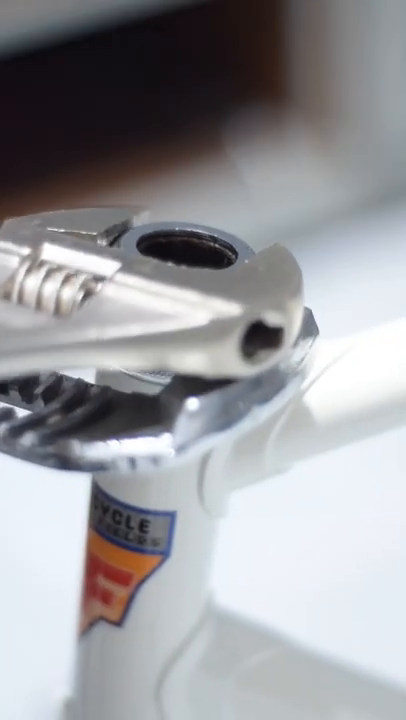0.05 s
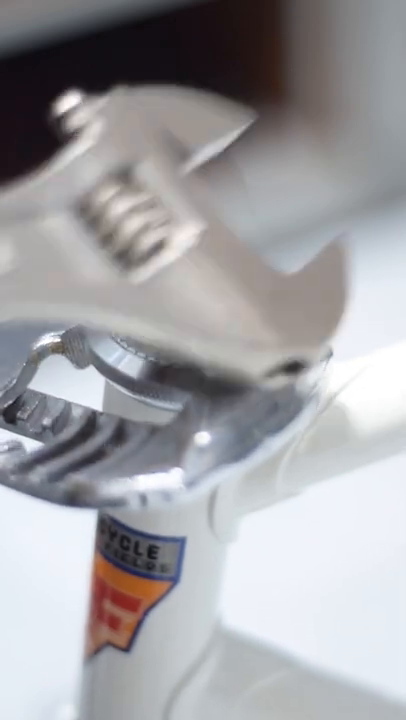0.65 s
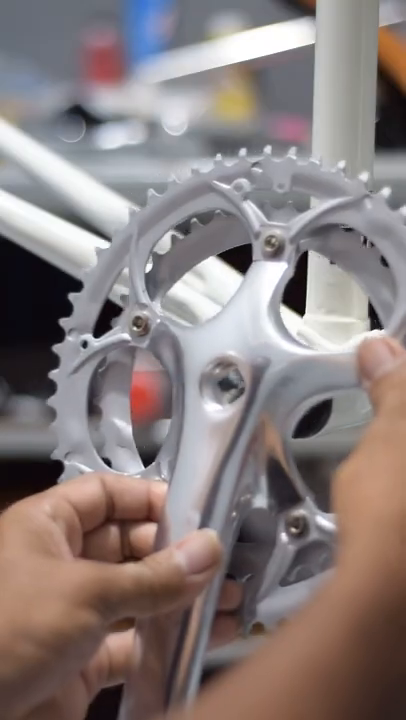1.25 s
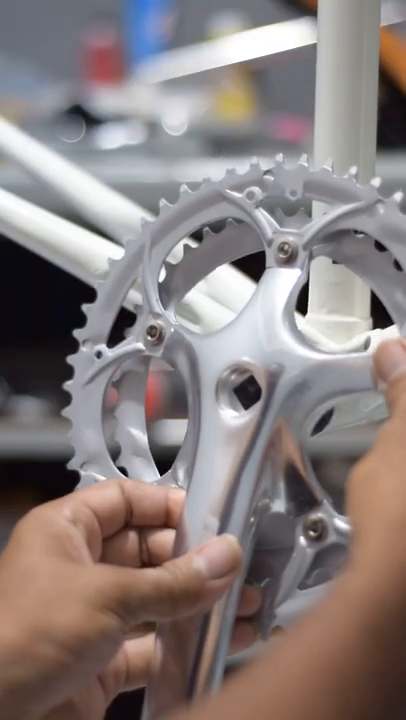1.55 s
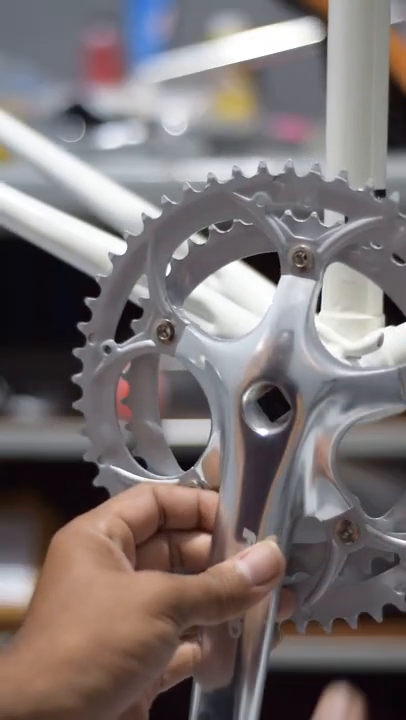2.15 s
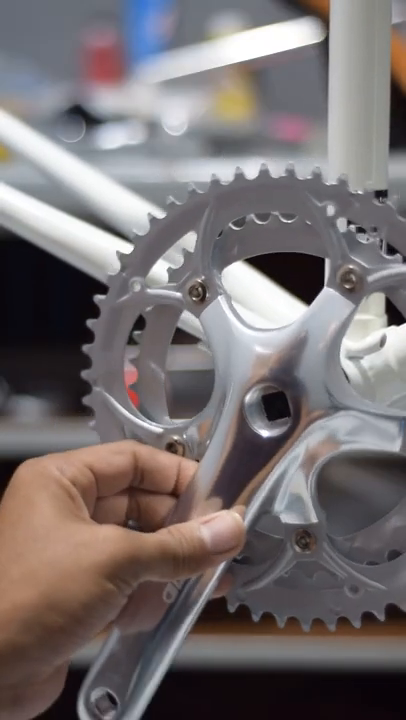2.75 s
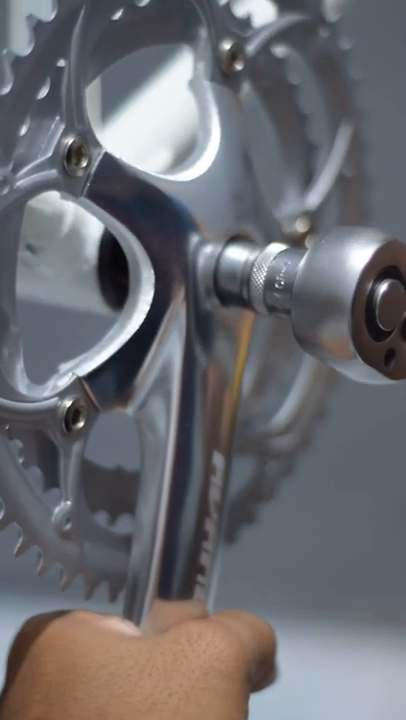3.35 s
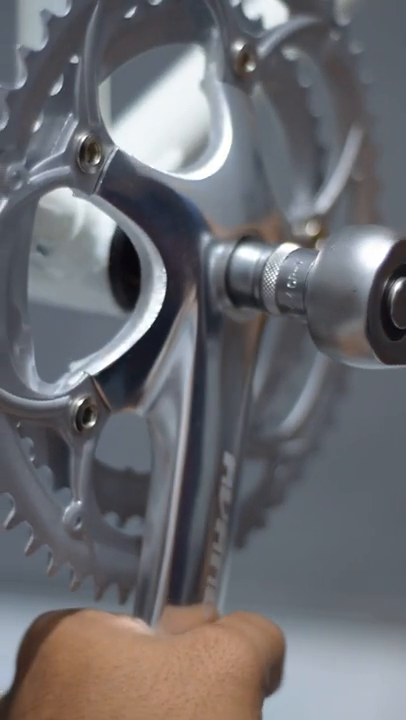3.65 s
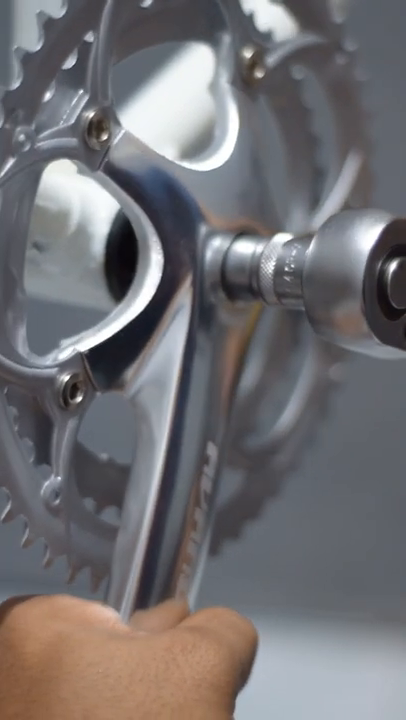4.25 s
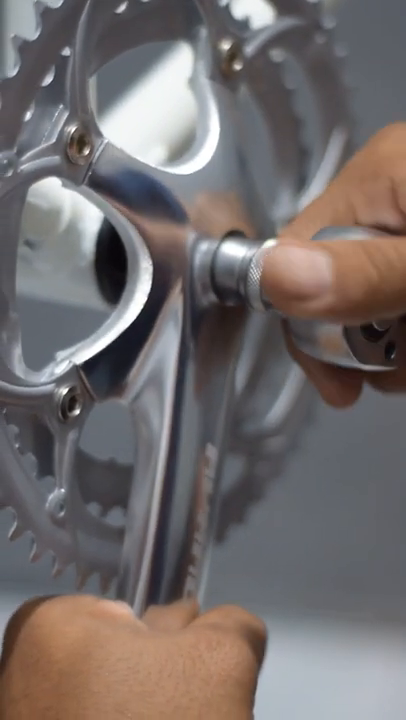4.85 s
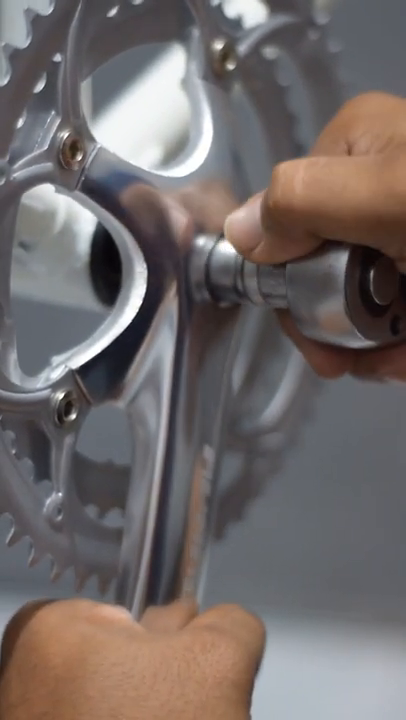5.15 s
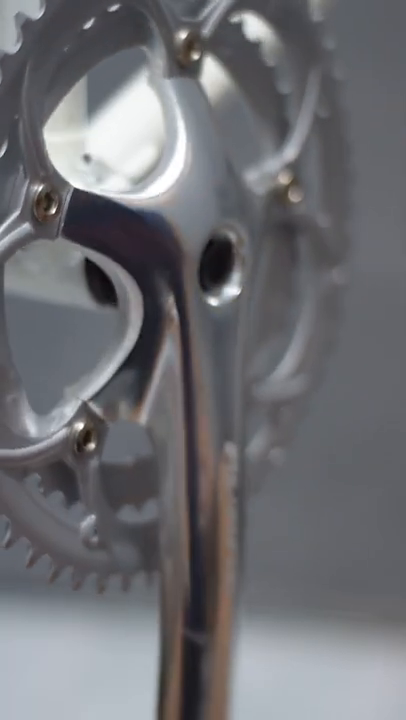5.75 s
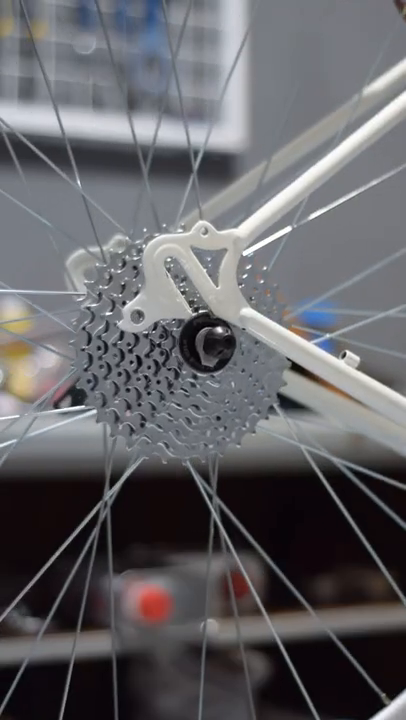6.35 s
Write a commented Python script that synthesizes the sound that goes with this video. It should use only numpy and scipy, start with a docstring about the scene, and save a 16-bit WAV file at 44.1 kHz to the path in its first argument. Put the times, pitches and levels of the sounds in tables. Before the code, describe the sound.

Rushing air and a wrench clink, then metal knocks and a clicking ratchet as a bicycle is assembled in a workshop.

```python
"""A hard-walled workshop where a bicycle is being put together, heard in mono. A wrench clinks off the
headset nut over a loud rush of air that stops abruptly. The chainset (cranks and chainrings) knocks onto
its axle, a ratchet clicks on the crank bolt, its socket is pulled off, and a wheel starts to spin.
Each hit is a short crack of noise, the ringing tones of the part, and the room's echo.
The air, the sliding metal and the whirring wheel are shaped noise."""
import sys
import numpy as np
from scipy import signal
from scipy.fft import rfft, irfft, next_fast_len
from scipy.io import wavfile
from scipy.ndimage import map_coordinates

SR = 44100
rng = np.random.default_rng(int(sys.argv[2]) if len(sys.argv) > 2 else 0)


def to_wav(s):
    """Save 16-bit WAV."""
    ch = np.atleast_2d(s).T  # columns
    pcm = np.round(np.clip(ch, -1, 1) * 32767)  # PCM
    wavfile.write(sys.argv[1], SR, pcm.astype(np.int16))


N = 282681

# The ratchet's clicks (time [s], relative level [dB], extra ring [dB])
RATCHET_CLICKS = [(3.0402, -43, -13), (3.0791, -20.5, -0.5), (3.1264, -16.5, 7), (3.1632, -19.5, 6.5),
                  (3.1937, -19, 13), (3.225, -17.5, 7.5), (3.2544, -21.5, -3), (3.2877, -21.5, -0.5),
                  (3.3294, -21, 1.5), (3.4115, -20.5, -5), (3.4637, -18, -5), (3.5142, -17.5, 3.5),
                  (3.5737, -19, -5), (3.712, -40, 0.5), (4.0731, -19.5, 3)]
# The tones it rings with (pitch [Hz], relative level [dB], time to fade by 60 dB [s])
RATCHET_TONES = [(1579, -22.5, 0.023), (1593, -13, 0.026), (3660, -11, 0.0089), (3804.5, -13.5, .05),
                 (4695, -23, 0.206), (5914, -20, 0.056), (7254, -10.5, 0.019), (7480, -10, 0.02),
                 (10984, -4.5, 0.0097), (10939, -6, 0.0148)]
# The colour of its crack (frequency [Hz], relative level [dB])
RATCHET_COLOUR = [(50, -68.5), (150, -54), (300, -26.5), (550, -10), (1000, -6), (1500, 3.5), (2100, -3.5),
                  (3600, -1), (5000, -1.5), (9500, -3), (12500, -12.5), (16000, -14.5)]

def ratchet():
    """A small catch drops over each tooth and bounces once; a slower handle gives a brighter snap."""
    tooth_s, slow_bright = 0.041, 0.9762  # usual wait; dB per octave gained each time the wait doubles
    bounce_s, bounce_db = .0072, -14.5
    pause_s, lift_s, lift_db = .3, .016, -24
    times = [row[0] for row in RATCHET_CLICKS]
    waits = np.diff(times, prepend=times[0] - tooth_s)
    touches = []
    for (s, db, ring_db), wait in zip(RATCHET_CLICKS, waits):
        bright = slow_bright * np.log2(wait / tooth_s)
        graze = (bright + 3.5, ring_db - 10.5)  # glancing touches are brighter and ring less
        touches.append((s, db, bright, ring_db))
        touches.append((s + bounce_s, db + bounce_db, *graze))
        if wait > pause_s:  # after a pause, the catch ticks on the tooth's tip before it drops
            touches.append((s - lift_s, db + lift_db, *graze))
    return strike(touches, RATCHET_TONES, RATCHET_COLOUR,
                  crack_s=0.0595, gain_db=20, echo_db=-1.5, pivot_hz=4030, snap_db=-1.5)


# The wrench's clinks (time [s], relative level [dB], brightness [dB per octave], extra ring [dB])
WRENCH_HITS = [(.674, -21, -5, -23.5), (.6825, -24.5, -5.5, -15.5), (.6903, -9.5, 2, 4.5),
               (.6935, -13.5, -1, -13), (.7012, -20.5, -1, -17), (.7527, -23.5, 2, -13),
               (1.0794, -30, 27, 3.5)]
# Its tones (pitch [Hz], relative level [dB], fade time [s])
WRENCH_TONES = [(2707, -12.5, 0.05), (3590, -19, 0.029), (5975, -12, 0.071), (7870, -11.5, 0.0053),
                (9210, -15, 0.034), (9235, -0.5, 0.02), (9260, -3, 0.019), (9220, -24.5, 0.27),
                (15200, -27, .03)]
# Its crack (frequency [Hz], relative level [dB])
WRENCH_COLOUR = [(40, -64), (110, -39.5), (260, -21), (900, -10.5), (3200, -3), (5000, -3), (8000, -5.5),
                 (10000, -3), (12500, -23.5), (16000, -27.5)]

def wrench():
    """The adjustable wrench slips off the nut with a bright clink."""
    return strike(WRENCH_HITS, WRENCH_TONES, WRENCH_COLOUR,
                  crack_s=0.025, gain_db=19.5, echo_db=-2, pivot_hz=5000, snap_db=-1)


# Knocks on the frame (time [s], relative level [dB], brightness [dB per octave], extra ring [dB])
CHAINSET_HITS = [(1.6945, -24.5, 0, 2.5), (1.715, -35, 0.5, 4), (1.772, -36.5, -1.5, 0.5),
                 (1.977, -55, 12.5, -24), (5.985, -54, 6.5, -13), (6.396, -45.5, -6, -13)]
# Their tones (pitch [Hz], relative level [dB], fade time [s])
CHAINSET_TONES = [(415.3, -17, 0.093), (869.2, -12, 0.213), (1064.6, -12.5, 0.65), (1183, -16, 0.106),
                  (1477.1, -6, 0.26), (1705, -9.5, 0.097), (2258.6, -15, 0.079), (3298, -17, 0.14),
                  (3760, -23.5, 0.125), (7283, -29.5, .03)]
# Their crack (frequency [Hz], relative level [dB])
CHAINSET_COLOUR = [(40, -46.5), (100, -55), (180, -12), (420, -10), (900, 2.5), (1500, 3), (2400, -5.5),
                   (3600, -14.5), (4500, -20.5), (6200, -27.5), (7400, -19.5), (9500, -35), (16000, -50)]

def chainset():
    """The chainset, and later the rear wheel, knock against the frame, which rings into the room."""
    return strike(CHAINSET_HITS, CHAINSET_TONES, CHAINSET_COLOUR,
                  crack_s=0.038, gain_db=21, echo_db=1.5, pivot_hz=1330, snap_db=-3.5)


# Knocks on the bolt (time [s], relative level [dB])
BOLT_HITS = [(4.4113, -23), (4.445, -32)]
# Their tones (pitch [Hz], relative level [dB], fade time [s])
BOLT_TONES = [(1254, -10.5, 0.0215), (2027, -12, 0.0355), (3560, -6, 0.018), (3666, -5, 0.033)]
# Their crack (frequency [Hz], relative level [dB])
BOLT_COLOUR = [(50, -62), (200, -13), (800, -6), (1400, 0), (2100, -1.5), (2700, -5), (3600, 4.5),
               (4300, -4.5), (10000, -14.5), (16000, -34)]

def bolt():
    """The loose tool knocks as it takes hold of the crank bolt."""
    knocks = [(s, db, 0, 0) for s, db in BOLT_HITS]
    return strike(knocks, BOLT_TONES, BOLT_COLOUR,
                  crack_s=0.032, gain_db=15, echo_db=-4, pivot_hz=2500, snap_db=-21)


# The socket's ticks (time [s], relative level [dB], brightness [dB per octave], extra ring [dB])
SOCKET_HITS = [(5.0797, -42.5, -2.5, -18.5), (5.2483, -42.5, -2, -12), (5.2878, -29, 3, -1),
               (5.2903, -28, 1, 0), (5.5701, -47, -1, -4)]
# Its tones (pitch [Hz], relative level [dB], fade time [s])
SOCKET_TONES = [(1281, -7, 0.0128), (1602, -10, 0.03), (3305, -11.5, 0.068), (3878, -7.5, 0.043),
                (4300, -18.5, 0.077), (5540, -10.5, .04), (7400, -17.5, 0.044), (8090, -15, 0.11),
                (9170, -14.5, 0.041), (10100, -12.5, 0.034), (11310, -18.5, .02), (12600, -25, 0.049)]
# Its crack (frequency [Hz], relative level [dB])
SOCKET_COLOUR = [(50, -62), (110, -30), (200, -11.5), (420, -10.5), (800, -2.5), (1400, -3.5), (2100, 1),
                 (2800, -2.5), (3900, -2), (5300, -2), (6500, -5.5), (11000, -8), (13000, -26),
                 (16000, -32.5)]

def socket():
    """The socket ticks and clatters free of the bolt."""
    return strike(SOCKET_HITS, SOCKET_TONES, SOCKET_COLOUR,
                  crack_s=.035, gain_db=19, echo_db=0, pivot_hz=4020, snap_db=-2.5)


# The crank's knocks (time [s], relative level [dB], brightness [dB per octave], extra ring [dB])
CRANK_HITS = [(3.578, -33.5, 0, -14.5), (3.597, -30.5, 0, -1.5), (3.7555, -31.5, -2, 1),
              (4.167, -41, -6, -2), (4.675, -49.5, -8, -10), (5.045, -55, -3, 2.5), (5.2, -47.5, -4, -9.5)]
# Its tones (pitch [Hz], relative level [dB], fade time [s])
CRANK_TONES = [(431.3, -20.5, 0.097), (1368, -15, 0.029), (1693.4, -8, 0.05), (2626, -10, 0.038)]
# Its hollow crack (frequency [Hz], relative level [dB])
CRANK_COLOUR = [(50, -61.5), (130, -23.5), (290, -27), (420, -11), (800, -2.5), (1600, 0), (2100, -6),
                (3700, -3), (4600, -27), (8000, -19.5), (16000, -43)]

def crank():
    """The crank arm rocks and knocks dully as the ratchet handle changes direction."""
    return strike(CRANK_HITS, CRANK_TONES, CRANK_COLOUR,
                  crack_s=0.065, gain_db=20.5, echo_db=3, pivot_hz=1412, snap_db=9)


# Taps on the axle (time [s], relative level [dB], brightness [dB per octave], extra ring [dB])
AXLE_HITS = [(1.3648, -31.5, -1, 1), (1.405, -47, 0.5, -8), (1.575, -48.5, 3.5, -0.5),
             (1.612, -43.5, 2.5, -13.5), (2.4315, -44.5, -2, -6)]
# Its tones (pitch [Hz], relative level [dB], fade time [s])
AXLE_TONES = [(761.5, -11.5, .07), (1054, -14, 0.093), (1258, -8.5, 0.27), (3438, -13.5, 0.124),
              (3840, -23, 0.22), (6500, -33, .4)]
# Its dull crack (frequency [Hz], relative level [dB])
AXLE_COLOUR = [(40, -40), (100, -35.5), (170, -7.5), (450, -1), (850, 0), (1400, -1), (2000, -7),
               (3000, -14.5), (5200, -19), (6000, -21.5), (16000, -44.5)]

def axle():
    """The crank meets the end of the square axle, which rings briefly."""
    return strike(AXLE_HITS, AXLE_TONES, AXLE_COLOUR,
                  crack_s=0.0294, gain_db=18.5, echo_db=2.5, pivot_hz=1300, snap_db=-3)


# The colour of rushing air (frequency [Hz], relative level [dB])
RUSH_COLOUR = [(25, -62), (80, -46), (127, -21.5), (190, -20), (260, -6.5), (526, -3), (800, -.5),
               (1160, 0), (2120, -4.5), (3140, -12), (6500, -22), (9220, -26.5), (14000, -38), (16000, -51)]

def air_rush():
    """A loud, nearly even rush of air, like a fan's."""
    level_db = -36 + .5 * waver(turns_per_s=8.5)
    return amp(level_db) * noise(RUSH_COLOUR)


# The frame's thuds (time [s], relative level [dB], brightness [dB per octave], extra ring [dB])
FRAME_HITS = [(2.185, -57, 1, 1), (2.435, -66, -1, -8), (3.61, -59.5, 2, -4.5)]
# Its low tones (pitch [Hz], relative level [dB], fade time [s])
FRAME_TONES = [(139.1, -14, .15), (182.2, -3.5, .15), (239.9, 0.5, 0.074)]
# The push itself (frequency [Hz], relative level [dB])
FRAME_COLOUR = [(40, -50), (100, -27.5), (160, 17), (300, -37.5), (600, -20.5), (3000, -53.5)]

def frame():
    """Soft pushes make the frame thud on its stand."""
    return strike(FRAME_HITS, FRAME_TONES, FRAME_COLOUR,
                  crack_s=0.039, gain_db=23, echo_db=2.5, pivot_hz=200, snap_db=-24.5)


# Strokes of the hand (start [s], rise [s], hold [s], level [dB])
SLIDE_STROKES = [(4.396, 0.023, 0.1886, -52.5), (4.889, .06, .01, -69), (5.679, 0.198, 0.095, -65)]
# Their hiss (frequency [Hz], relative level [dB])
SLIDE_COLOUR = [(700, -28.5), (2500, 4), (4000, -1.5), (7000, -0.5), (11000, -5.5), (16000, -18.5)]

def sliding_metal():
    """Metal hisses softly under the fingers; each stroke dies away as the hand slows."""
    strokes = sum(swell(*stroke, fade_db_per_s=142.5) for stroke in SLIDE_STROKES)
    return strokes * noise(SLIDE_COLOUR)


# The whirr of the wheel's hub (frequency [Hz], relative level [dB])
HUB_COLOUR = [(1500, -28), (3000, -4), (3700, -0.5), (4250, 2), (4900, -16.5), (6500, -7), (7400, -19.5),
              (7900, -11), (8700, -28), (16000, -42)]

def wheel_hub():
    """The rear wheel's bearings whirr faintly once it spins."""
    return swell(start_s=6, rise_s=0.01, hold_s=.4, db=-63.5) * noise(HUB_COLOUR)


# The colour of the quiet room (frequency [Hz], relative level [dB])
HISS_COLOUR = [(18, -55), (30, -33.5), (49, -20), (426, -3.5), (526, -4), (600, -5), (649, -5.5),
               (780, -3.5), (844, -2.5), (962, -4.5), (1130, -3.5), (4910, -16), (16000, -33)]

def room_hiss():
    """The room's own faint, steady hiss."""
    return amp(-61) * noise(HISS_COLOUR)


# How long the workshop echoes (frequency [Hz], time to fade by 60 dB [s])
ECHO_FADES = [(200, 1.4), (530, 0.8874), (1400, 0.7765), (3700, 0.6544), (9700, 0.6146), (16000, 0.2835)]
# How strongly it echoes (frequency [Hz], relative level [dB])
ECHO_COLOUR = [(200, 5.5), (1400, 9.5), (4000, 6.5), (9000, -3), (16000, -2.5)]

def echo(x, build_s=0.0015):
    """The walls answer with a wash of sound that builds quickly and loses its treble first."""
    hz, t, bands = signal.stft(rng.standard_normal(SR), SR, nperseg=256)
    fade_s = np.maximum(along(ECHO_FADES, hz), .05)[:, None]
    even_out = np.sqrt(2 * np.log(1000) / (fade_s * SR))  # equal energy however long the fade
    colour = amp(along(ECHO_COLOUR, hz))[:, None]
    tail = signal.istft(bands * decay(t, fade_s) * even_out * colour, SR, nperseg=256)[1]
    tail *= 1 - np.exp(-np.arange(len(tail)) / SR / build_s)
    return signal.fftconvolve(x, tail)[:len(x)]


def strike(hits, tones, colour, crack_s, gain_db, echo_db, pivot_hz, snap_db, snap_s=0.0052):
    """Each hit is a short crack plus the part's tones, which shift a little with the grip."""
    def octaves(f):
        """Distance from pivot_hz: brightness lifts what lies above it and lowers what lies below."""
        return np.log2(np.clip(f, 200, 8000) / pivot_hz)

    out = np.zeros(N + 2 * SR)
    t = np.arange(SR) / SR
    hz, tone_db, fade_s = np.transpose(tones)
    tone_fades = decay(t, fade_s[:, None])
    signs = (-1) ** np.arange(len(hz))
    # steel on steel snaps for an instant before the body takes over
    crack_fade = (decay(t, crack_s) + amp(snap_db) * decay(t, snap_s))[:SR // 5]
    for s, db, bright, ring_db in hits:
        burst = rng.standard_normal(len(crack_fade)) * crack_fade
        crack = unit_energy(tint(burst, lambda f: amp(along(colour, f) + bright * octaves(f))))
        detune, scatter_db = rng.normal(0, [[.004], [1.5]], (2, len(hz)))
        pitches = hz * (1 + detune)
        rings = unit_energy(np.sin(2 * np.pi * pitches[:, None] * t) * tone_fades)
        strengths = amp(tone_db + ring_db + bright * octaves(hz) + scatter_db)
        hit = (strengths * signs) @ rings
        hit[:len(crack)] += crack
        hit = amp(db + gain_db) * unit_energy(hit)
        out[round(s * SR):][:SR] += hit + amp(echo_db) * echo(hit)
    # small parts give off no deep bass
    return signal.sosfilt(signal.butter(2, 130, "highpass", fs=SR, output="sos"), out[:N])


def amp(db):
    """Turn decibels into a multiplier."""
    return 10 ** (np.asarray(db) / 20)


def along(points, hz):
    """Read between a table's rows, spacing frequencies by octaves."""
    f, values = np.transpose(points)
    return np.interp(np.log(hz + 1), np.log(f + 1), values)


def decay(t, fade_s):
    """A fade that drops 60 dB every fade_s seconds."""
    return np.exp(-np.log(1000) * t / fade_s)


def swell(start_s, rise_s, hold_s, db, fade_db_per_s=0):
    """The loudness of one movement: it rises, holds, then fades if given a fade rate."""
    t = np.arange(N) / SR - start_s
    fading_s = np.maximum(t - rise_s - hold_s, 0)
    return np.clip(t / rise_s, 0, 1) * amp(db - fade_db_per_s * fading_s)


def waver(turns_per_s):
    """A smooth curve through evenly spaced random values."""
    values = rng.standard_normal(int(N * turns_per_s / SR) + 4)
    return map_coordinates(values, [np.arange(N) * turns_per_s / SR])


def unit_energy(x):
    """Scale x so that its squares sum to one."""
    return x / np.sqrt(np.sum(x ** 2, axis=-1, keepdims=True) + 1e-20)


def tint(x, gain):
    """Colour x by a gain for each frequency, letting no sound come ahead of the hit."""
    m = next_fast_len(2 * len(x), real=True)
    gains = np.maximum(gain(np.fft.rfftfreq(m, 1 / SR)), 1e-6)
    cepstrum = irfft(np.log(gains), m)
    # fold the filter's late half onto its early half
    cepstrum[1:m // 2] *= 2
    cepstrum[m // 2 + 1:] = 0
    return irfft(rfft(x, m) * np.exp(rfft(cepstrum)), m)[:len(x)]


def noise(colour):
    """Steady noise of strength one with the given colour."""
    m = next_fast_len(N, real=True)
    gains = amp(along(colour, np.fft.rfftfreq(m, 1 / SR)))
    x = irfft(rfft(rng.standard_normal(m)) * gains, m)[:N]
    return x / np.std(x)


def scene():
    """Add up all the sounds, the same in both channels."""
    stop_s = 1.2245  # the wrench's ringing and the rush of air both break off at once here
    headset = (np.arange(N) / SR < stop_s) * (wrench() + air_rush())
    mounting = axle() + chainset() + frame()
    tightening = ratchet() + crank() + bolt() + socket()
    mono = headset + mounting + tightening + sliding_metal() + wheel_hub() + room_hiss()
    return np.array([mono, mono])


def record(dry):
    """Take away the very highest treble."""
    top_hz, slope_hz = 16100, 400
    m = next_fast_len(N + SR // 2, real=True)
    kept = np.clip((top_hz - np.fft.rfftfreq(m, 1 / SR)) / slope_hz, 0, 1) ** 2
    return irfft(rfft(dry, m) * kept, m)[:, :N]


dry = scene()
out = record(dry)
to_wav(out)
```